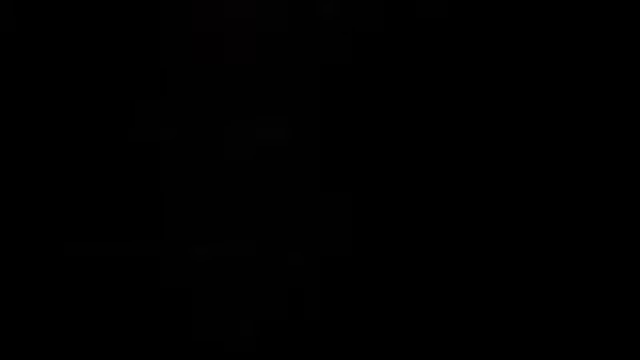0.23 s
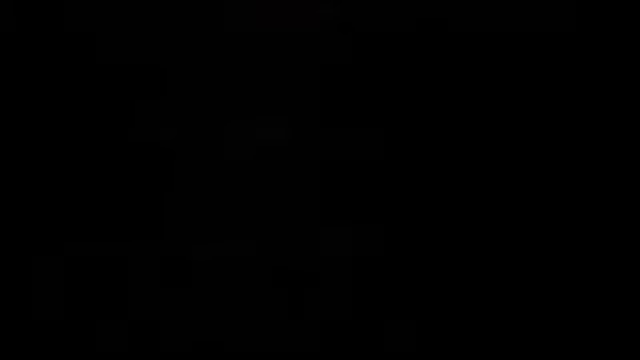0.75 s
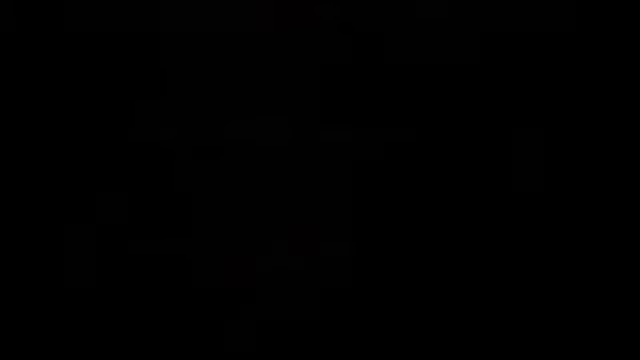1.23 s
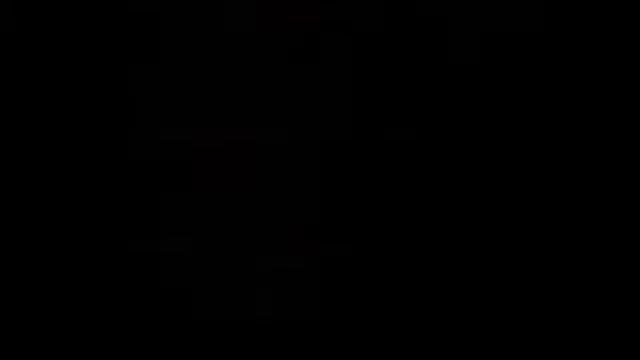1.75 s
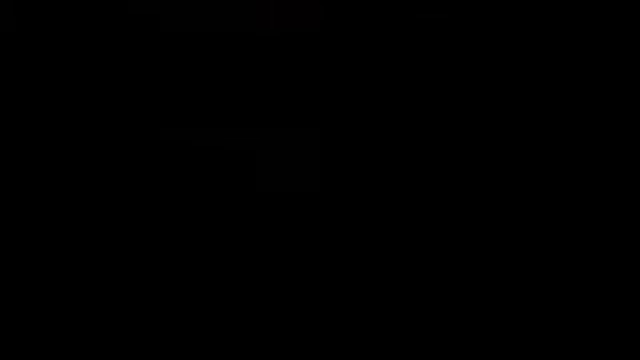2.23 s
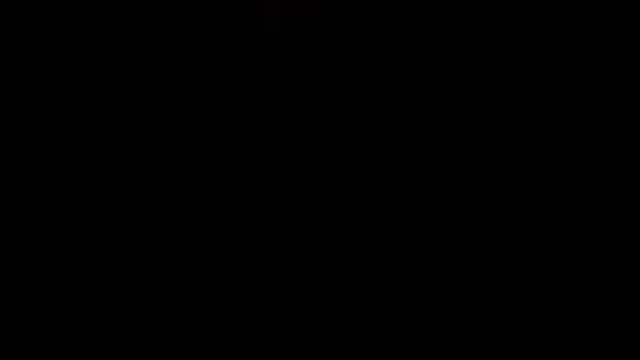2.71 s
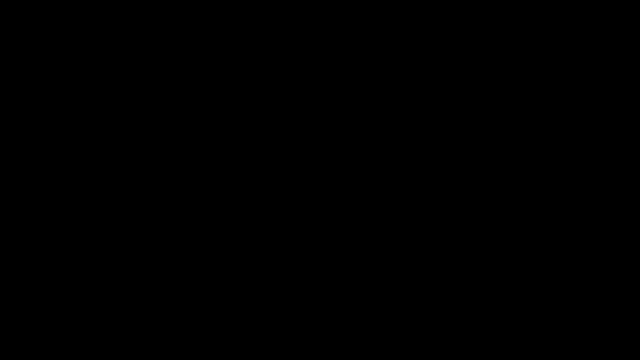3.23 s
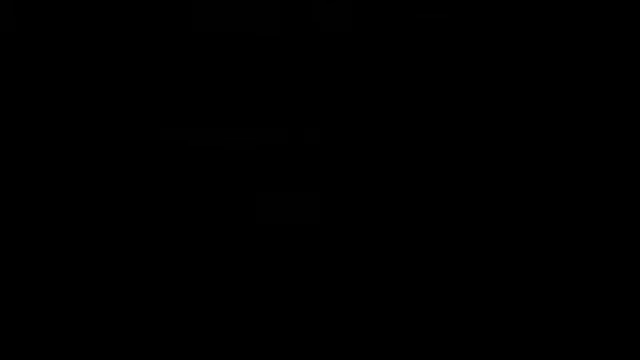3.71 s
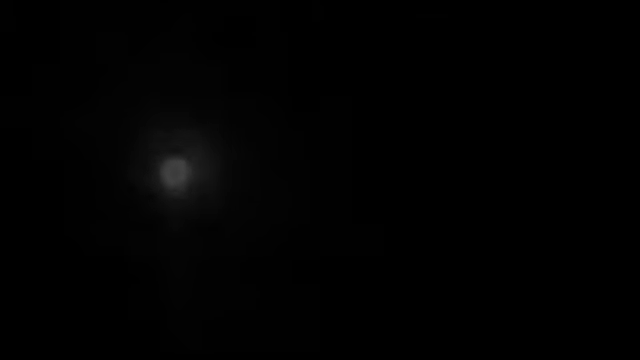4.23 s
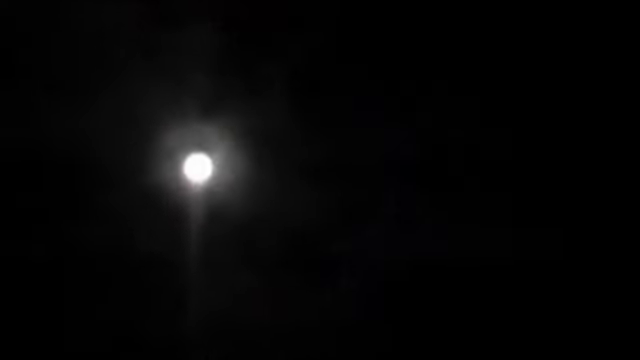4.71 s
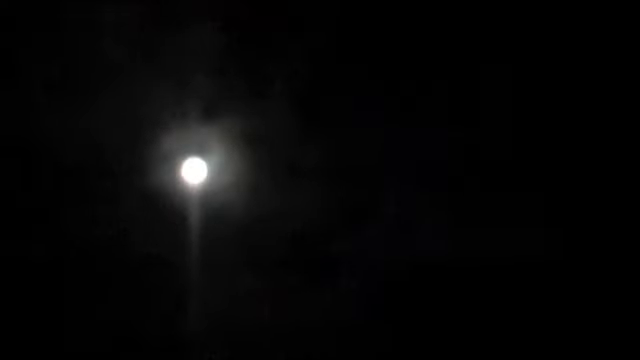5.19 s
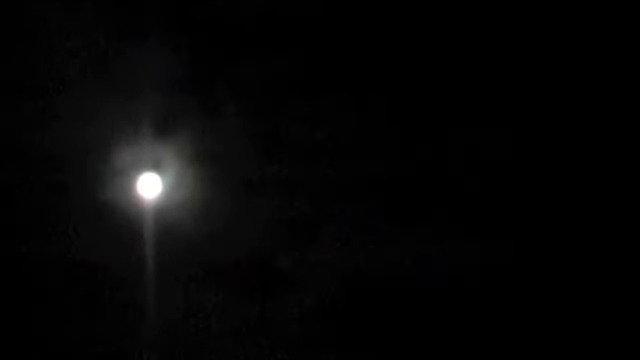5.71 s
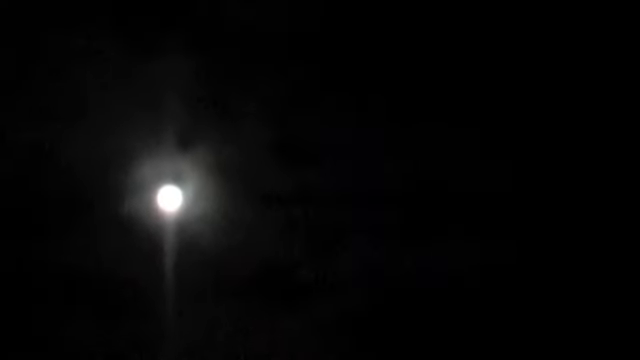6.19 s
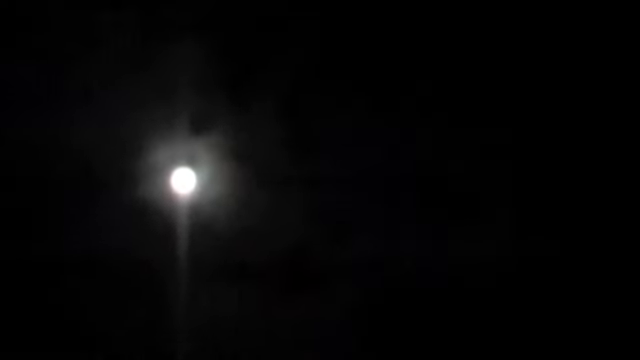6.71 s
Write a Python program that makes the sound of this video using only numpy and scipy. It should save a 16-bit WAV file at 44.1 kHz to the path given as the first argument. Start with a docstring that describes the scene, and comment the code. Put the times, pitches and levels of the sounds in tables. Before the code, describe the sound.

Sharp owl yelps and one long, quavering hoot from another owl echo through a night garden above a soft hiss.

```python
"""Two tawny owls in a garden at night. Throughout lie the wash of a distant town and microphone hiss;
a far engine hums briefly at the start. From about 1 s the female gives ten short, rising yelps, each a
harmonic series filtered by throat and beak, then scattered by trees and houses. After the fourth, the
male gives one loud, arching hoot. Wall echoes interfere with its gliding pitch and make it waver,
and it lingers far off while her last yelps sound."""
import sys
import numpy as np
from scipy import signal
from scipy.fft import rfft, irfft
from scipy.io import wavfile
from scipy.ndimage import uniform_filter1d

SR = 44100
rng = np.random.default_rng(int(sys.argv[2]) if len(sys.argv) > 2 else 0)


def to_wav(sig):
    """Store sig (one row per channel, or 1-D mono) as 16-bit WAV at the path in sys.argv[1].

    Samples outside -1..1 are clipped; the rate is SR.
    """
    pcm = np.clip(np.atleast_2d(sig), -1, 1) * 32767
    pcm = np.round(pcm).astype(np.int16)
    wavfile.write(sys.argv[1], SR, pcm.T)  # frames by channels


N = 306495


def amp(db):
    """Amplitude ratio of a level in decibels."""
    return 10 ** (np.asarray(db) / 20)


def unit_rms(x):
    """Normalisation to an rms of 1."""
    return x / np.sqrt(np.mean(x ** 2) + 1e-20)


def at_hz(points, hz):
    """Interpolation of a spectrum on a logarithmic frequency axis."""
    f, value = np.transpose(points)
    return np.interp(np.log(hz + 1), np.log(f), value)


def at_time(points, t):
    """Linear interpolation of a contour in time."""
    return np.interp(t, *np.transpose(points))


def wobble(n, hz):
    """Random modulation: n samples of noise, low-passed near hz, with rms about 1."""
    f = np.fft.rfftfreq(SR * 2, 1 / SR)
    return unit_rms(irfft(rfft(rng.standard_normal(SR * 2)) * np.exp(-(f / hz) ** 2)))[:n]


def add(mix, start_s, sound):
    """Superposition of a sound on the mix."""
    part = mix[..., round(start_s * SR):][..., :sound.shape[-1]]
    part += sound[..., :part.shape[-1]]


def reverberation(x, t60, onset_s, coherence, colour=((100, 0), (10000, 0))):
    """A diffuse field builds up, then decays exponentially in each band; the response lasts 3 s."""
    left, other = rng.standard_normal((2, 3 * SR))
    right = coherence * left + np.sqrt(1 - coherence ** 2) * other
    hz, t, spectra = signal.stft([left, right], SR, nperseg=256)
    envelope = amp(-60 * t / at_hz(t60, hz)[:, None]) * (1 - np.exp(-(t / onset_s) ** 3))
    energy = (envelope ** 2).sum(1, keepdims=True) * t[1] * SR
    envelope *= amp(at_hz(colour, hz))[:, None] / np.sqrt(energy)
    response = signal.istft(spectra * envelope, SR, nperseg=256)[1]
    return signal.fftconvolve(x[None], response, axes=1)[:, :N]


def night_air(level_db=-50.5, patchy_db=1.45, crossover_hz=2500):
    """Partly coherent noise: town wash below the crossover, hiss above, each swelling slowly."""
    spectrum = [(20, -18.5), (30, -18.5), (50, -15), (68, -10.5), (100, -8.5), (150, -11.5), (250, -7.5),
                (500, -1), (850, 1), (1500, -5.5), (2600, -12), (3300, -19), (6500, -21.5), (8300, -20.5),
                (8900, -19), (9500, -20), (10800, -20.5), (12500, -24), (15700, -24)]  # noise density: frequency_hz, relative_db
    ear_coherence = [(50, .1), (200, 0.31), (450, .35), (900, 0), (2500, 0), (9000, 0.27), (15000, 0)]  # likeness at the two ears: frequency_hz, coherence
    balance = [(60, 2.0), (180, 1.5), (550, 1.6), (1300, -1.5), (4970, 0.0), (15000, -1.2)]  # left over right: frequency_hz, difference_db
    wash_swell = [(0, 1), (.7, 1.5), (1.7, -3), (2.4, 0.14), (4, -1.4), (5.3, 0.24), (6.2, -2),
                  (6.95, -1.5)]  # drift of the wash: time_s, gain_db
    hiss_swell = [(0, 2), (.7, 1.5), (2.4, -0.54), (4.7, -2.1), (5.7, 1), (6.3, -2), (6.95, -2.5)]  # drift of the hiss: time_s, gain_db
    t = np.arange(N // 512 + 5)[:, None] * 512 / SR
    hz = np.fft.rfftfreq(2048, 1 / SR)
    a, b, c, d, patches = rng.standard_normal((5, len(t), len(hz)))
    coherence = at_hz(ear_coherence, hz)
    left = a + 1j * b
    right = coherence * left + np.sqrt(1 - coherence ** 2) * (c + 1j * d)
    hiss_share = hz ** 2 / (hz ** 2 + crossover_hz ** 2)
    swell_db = at_time(wash_swell, t) * (1 - hiss_share) + at_time(hiss_swell, t) * hiss_share
    patches = unit_rms(uniform_filter1d(uniform_filter1d(patches, size=10, axis=0), size=16, axis=1))
    spectra = np.array([left, right]) * amp(at_hz(spectrum, hz) + swell_db + patchy_db * patches)
    spectra *= amp(np.array([.5, -.5])[:, None, None] * at_hz(balance, hz))
    noise = signal.istft(spectra.transpose(0, 2, 1), nperseg=2048, noverlap=1536)[1]
    return amp(level_db) * unit_rms(noise[:, :N])


def engine_drone(pitch_hz=126):
    """A far engine hums as one amplitude-modulated sinusoid."""
    swell = [(.2, -90), (.4, -68), (.7, -75), (.88, -64.5), (1.1, -80), (1.35, -68.5), (1.7, -75),
             (1.95, -90)]  # rms envelope: time_s, level_db
    t = np.arange(N) / SR
    return np.sqrt(2) * amp(at_time(swell, t)) * np.sin(2 * np.pi * pitch_hz * t)


def voice_break(progress, break_at, pitch_jump=.2, lead_in_db=-22, crescendo_db=20, jump_db=2):
    """Register break: part way through a yelp's rise, pitch and level jump and the voice turns harsh."""
    broken = .5 + .5 * np.tanh((progress - break_at) / .146)
    broken /= broken.max()
    climb = (1 - pitch_jump) * progress ** 1.3 + pitch_jump * broken
    effort_db = lead_in_db + crescendo_db * progress + jump_db * broken
    harsh_burst = np.exp(-((progress - break_at) / .066) ** 2)
    return climb, effort_db, np.maximum(harsh_burst, .44 * broken)


def vocal_tract(hz, climb, beak_db, upper_db):
    """Formant gain in dB: as pitch climbs, the beak rings near 3.4 kHz; the 5 kHz band mostly softens."""
    throat = [(750, 0.5), (1100, 5), (1700, 0.5), (2300, 2.5), (2700, 5.5), (3500, -2), (4100, -4),
              (4900, 2), (5800, -8.5), (7000, -17.5), (8500, -19), (11000, -30.5), (15500, -50.5)]  # fixed throat response: frequency_hz, gain_db
    beak = beak_db * climb ** .16 * np.exp(-((hz - 3370) / 394) ** 2)
    upper = upper_db * climb * np.exp(-((hz - 5000) / 710) ** 2)
    return at_hz(throat, hz) + beak + upper


def yelp(rise_s, fall_s, start_hz, top_hz, end_hz, level_db, rasp, break_at,
         fundamental_db, beak_db, upper_db):
    """Source and filter: 13 harmonics sweep up through the formants, as an analytic signal."""
    t = np.arange(0, rise_s + fall_s, 1 / SR)
    n, harmonic = len(t), np.arange(1, 14)[:, None]
    climb, effort_db, harshness = voice_break(np.minimum(t / rise_s, 1), break_at)
    falling = np.maximum((t - rise_s) / fall_s, 0) ** 2
    pitch_hz = start_hz + (top_hz - start_hz) * climb + (end_hz - top_hz) * falling
    phase = 2 * np.pi * np.cumsum(pitch_hz * (1 + .013 * climb * wobble(n, 130))) / SR
    partial_hz = harmonic * pitch_hz
    bright_db = .25 * (level_db + 38) + 22 * np.log2(top_hz / 1190)  # louder, higher yelps are brighter
    tract_db = vocal_tract(partial_hz, climb, beak_db + bright_db, upper_db + bright_db)
    # the soft lead-in is darker; the fundamental thins out at the highest pitches
    source_db = -6.5 * (1 - climb) ** 5 * np.log2(partial_hz / 2100)
    source_db += (harmonic == 1) * (fundamental_db - 18 * np.maximum(np.log2(pitch_hz / 1070), 0))
    flutter_db = 1.7 * np.sqrt(harmonic) * wobble(13 * n, 70).reshape(13, -1)
    gains = amp(source_db + tract_db + flutter_db)
    unsteady = rasp * (harshness + .5 * falling)
    phase += amp(-3) * unsteady * wobble(n, 500)  # uneven cycles smear the upper harmonics most
    shifts = rng.uniform(0, 2 * np.pi, harmonic.shape)  # throat and branches shift each phase
    voice = (gains * np.exp(1j * (harmonic * phase + shifts))).sum(0)
    voice *= 1 + unsteady * wobble(n, 600)
    voice /= np.sqrt((gains[:, climb > .7] ** 2).sum(0).mean() / 2)
    gate = np.minimum(t / .017, 1) * signal.windows.tukey(n, .1)
    return voice * amp(level_db + effort_db - 12 * falling) * gate


def female_yelps(move_s=4.4):
    """Directional radiation: the yelps as they reach the ears, and as sent out into the garden."""
    # calls: top_s, rise_s, fall_s, start_hz, top_hz, end_hz, level_db, rasp_share, break_share_of_rise
    calls = [ (1.109, .088, .021, 780, 1158, 970, -30, .26, 0.57),
             (1.545, .094, .019, 838, 1208, 1136, -29.5, 0.25, 0.69),
             (1.926, 0.079, .015, 864, 1315, 1250, -33, .28, 0.9),
             (2.522, 0.1, 0.04, 808, 1087, 1006, -42.5, .29, .72),
             (3.381, .1, .048, 812, 1173, 1037, -40, 0.43, 0.68),
             (3.623, 0.064, .082, 909, 1050, 948, -52.5, 0.16, 0.76),
             (4.182, .096, 0.0351, 831.4, 1145, 1015, -34, 0.18, .77),
             (4.619, 0.057, 0.0154, 922, 1133, 1060, -47.5, 0.6, 0.91),
             (5.011, .083, 0.019, 905, 1278, 1190, -40.5, 0.32, 0.87),
             (5.402, 0.074, 0.0091, 904, 1362, 1320, -38.5, 0.43, 0.79)]
    # her perch before and after move_s: left_lag_rad, fundamental_db, beak_db, upper_db
    perches = [(.28, -3.5, 8.3, -4), (.98, 4.5, 5.6, -4.5)]
    direct, sent = np.zeros((2, N)), np.zeros(N)
    for top_s, rise_s, fall_s, *pitches, level_db, rasp, break_at in calls:
        lag_rad, *colour = perches[int(top_s > move_s)]
        call = yelp(rise_s, fall_s, *pitches, level_db, rasp, break_at, *colour)
        add(direct, top_s - rise_s, (call * np.exp(-1j * np.array([[lag_rad], [0]]))).real)
        away_db = -.3642 * (level_db + 38)  # quieter yelps face away and have a larger share of echo
        add(sent, top_s - rise_s, amp(away_db) * call.real)
    return direct, sent


def garden_scatter(x):
    """Multiple scattering from trees and houses gives a short, coloured reverberation."""
    colour = [(800, 11), (1200, -6.5), (2300, 2.5), (3400, -6), (5000, -4.5), (10000, 3)]  # scattered spectrum: frequency_hz, gain_db
    decay = [(800, 0.53), (2300, 0.32), (5000, 0.29), (12000, .25)]  # reverberation time: frequency_hz, t60_s
    return reverberation(x, decay, onset_s=.019, coherence=.8, colour=colour)


def house_echo(x, delay_s=.05, spread_s=.009, cutoff_hz=3900):
    """Diffuse reflection: a rough house front returns a yelp smeared and dulled."""
    t = np.arange(SR // 8) / SR
    common, per_ear = rng.standard_normal(len(t)), rng.standard_normal((2, len(t)))
    response = (common + .5 * per_ear) * np.exp(-((t - delay_s) / spread_s) ** 2)
    response /= np.linalg.norm(response[0])
    response = signal.sosfilt(signal.butter(2, cutoff_hz, fs=SR, output="sos"), response)
    return signal.fftconvolve(x[None], response, axes=1)[:, :N]


def far_echoes(x):
    """Reverberation of the whole neighbourhood, in which low frequencies last longest."""
    decay = [(800, 10), (1300, 2.5), (3000, 1.2), (10000, .5)]  # reverberation time: frequency_hz, t60_s
    return reverberation(x, decay, onset_s=.19, coherence=.16)


def male_hoot(level_db=-14, peak_s=3.145, swell_db=12, sink_db=22, attack_s=.022, release_s=.03):
    """A nearly pure tone, modulated in frequency and amplitude, with faint harmonics and huskiness."""
    contour = [(2.635, 752.5), (2.685, 830.3), (2.755, 749.5), (2.89, 798.3), (3.03, 879.2), (3.12, 878.8),
               (3.27, 848.2), (3.41, 760.3), (3.53, 627.4)]  # a flick up, a dip, then one long arch: time_s, pitch_hz
    overtones = [(-38.5, 8.5), (-46, 5), (-60.5, 6)]  # harmonics 2 to 4: relative_db, press_boost_db
    start_s, end_s = contour[0][0], contour[-1][0]
    t = np.arange(start_s, end_s, 1 / SR)
    pitch_hz = at_time(contour, t) * (1 + .00071 * wobble(len(t), 120))
    phase = 2 * np.pi * np.cumsum(pitch_hz) / SR
    before_peak = np.maximum((peak_s - t) / (peak_s - start_s), 0)
    after_peak = np.maximum((t - peak_s) / (end_s - peak_s), 0)
    effort_db = -swell_db * before_peak - sink_db * after_peak ** 2
    press = np.exp(-((t - 3.095) / .06) ** 2)  # the voice presses just before its peak
    husk = amp(-46) * wobble(len(t), 300) * np.cos(phase)
    tone = amp(effort_db) * (np.sin(phase) + husk)
    for harmonic, (relative_db, boost_db) in enumerate(overtones, start=2):
        tone += amp(relative_db + .24 * effort_db + boost_db * press) * np.sin(harmonic * phase)
    gate = np.minimum((t - start_s) / attack_s, 1) ** 2 * np.minimum((end_s - t) / release_s, 1)
    hoot = np.zeros(N)
    add(hoot, start_s, np.sqrt(2) * amp(level_db) * tone * gate)
    return hoot


def wall_interference(x, left_lag_s=.000115):
    """Interference: the direct sound plus delayed reflections, which beat against a gliding tone."""
    reflections = [(.00343, .32, .00051), (.00656, .45, -.00005), (.01495, .2, -.00011),
                   (.02015, .29, .00013), (.02347, .43, .00019), (.04603, .15, -.00025),
                   (.05304, .31, .00023), (.06276, .18, -.00003), (.07486, .1, .00008),
                   (.1491, .12, .00025)]  # echoes from walls and fences: delay_s, gain, left_lag_s
    omega = 2 * np.pi * np.fft.rfftfreq(N, 1 / SR)
    ears = np.array([[.5], [-.5]])
    direct = np.exp(-1j * omega * np.array([[left_lag_s], [0]]))
    echoes = sum(gain * np.exp(-1j * omega * (delay + ears * lag)) for delay, gain, lag in reflections)
    return irfft(rfft(x) * (direct + echoes), N)


def scene():
    """Superposition of both owls and their echoes on the night air and the engine."""
    male = male_hoot()
    female, sent = female_yelps()
    hoot_tail = reverberation(male, t60=[(800, .72), (3000, .5)], onset_s=.17, coherence=.1)
    hooting = wall_interference(male) + amp(-19) * hoot_tail
    yelping = female + amp(-12.5) * house_echo(female.mean(0)) + garden_scatter(sent)
    far = far_echoes(amp(-30.5) * male + amp(-34) * sent)
    return night_air() + engine_drone() + yelping + far + hooting


def record(dry):
    """Band limiting by a linear-phase low-pass filter."""
    lowpass = signal.firwin(511, cutoff=15800, window=("kaiser", 9), fs=SR)
    return signal.oaconvolve(dry, lowpass[None], "same")


dry = scene()
out = record(dry)
to_wav(out)
```